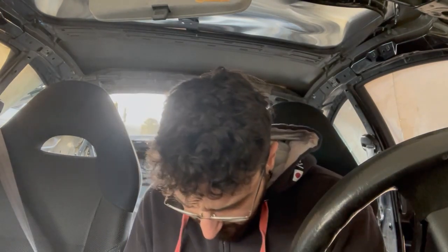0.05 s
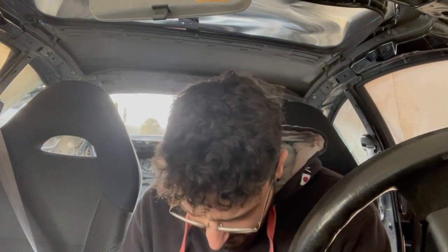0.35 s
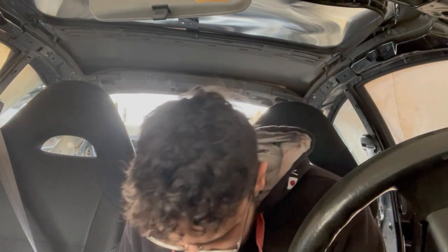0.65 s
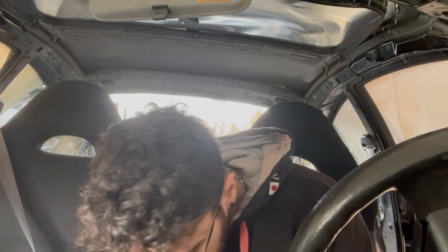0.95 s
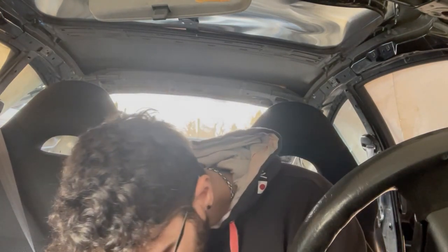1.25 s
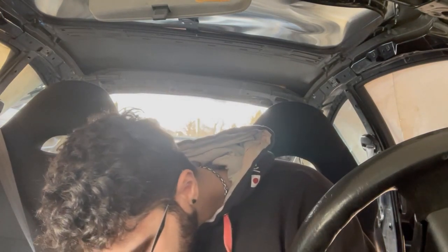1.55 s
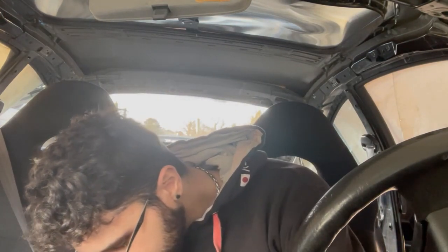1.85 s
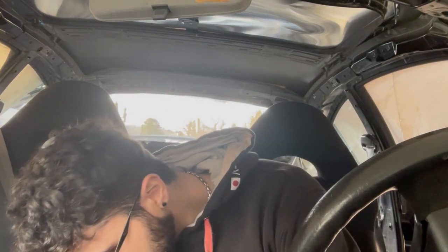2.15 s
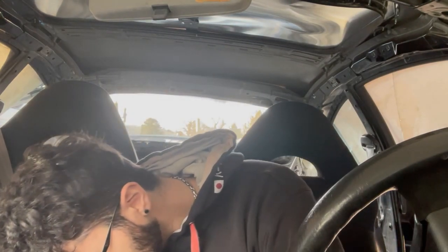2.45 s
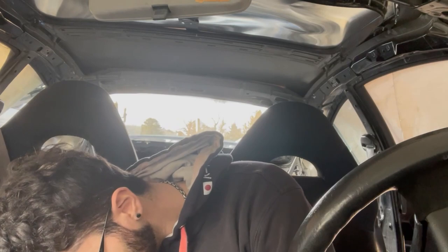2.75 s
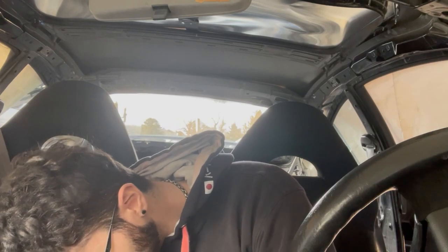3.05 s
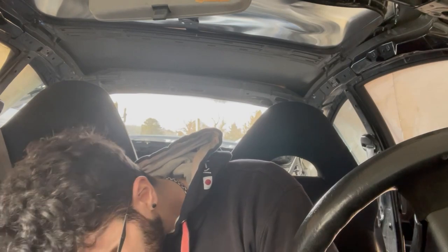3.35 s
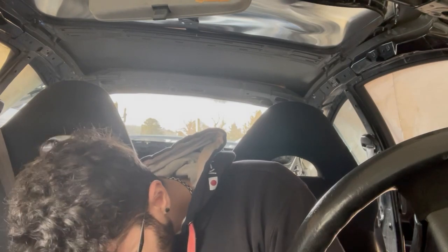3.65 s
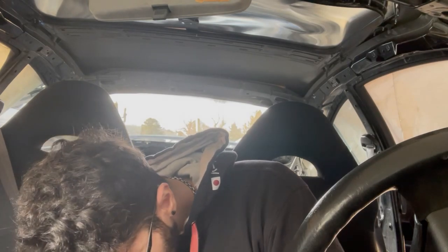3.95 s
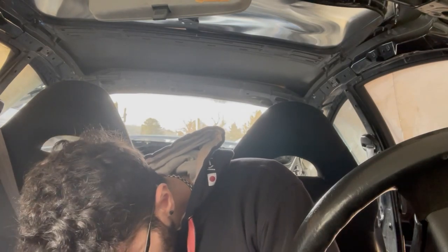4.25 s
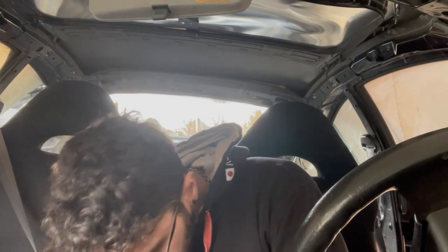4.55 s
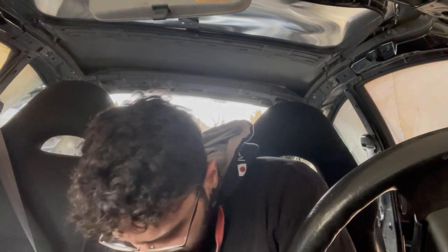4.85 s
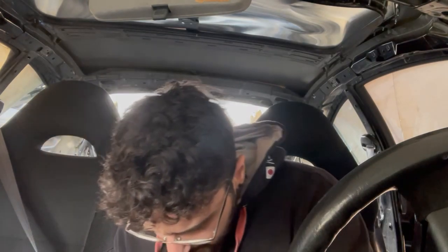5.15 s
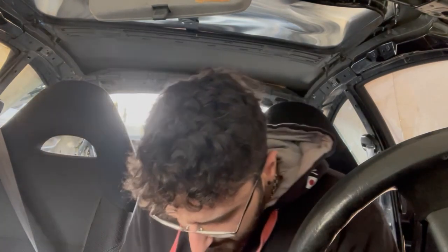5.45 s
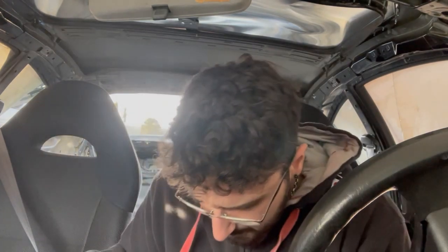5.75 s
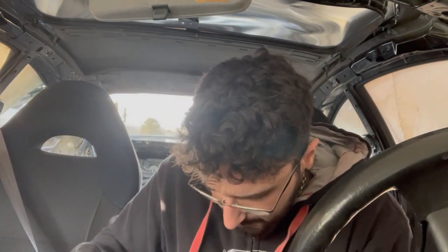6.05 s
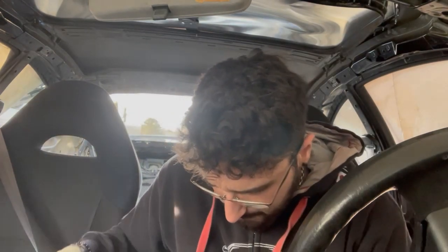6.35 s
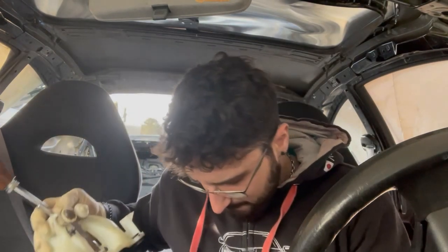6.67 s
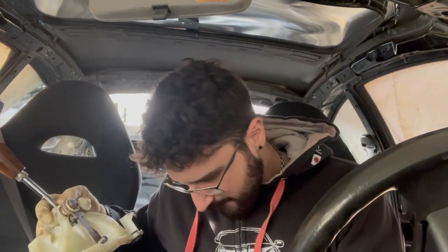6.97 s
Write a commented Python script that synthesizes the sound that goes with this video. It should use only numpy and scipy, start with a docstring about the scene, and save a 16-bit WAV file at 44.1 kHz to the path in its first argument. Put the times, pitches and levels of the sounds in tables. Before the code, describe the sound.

A gear shifter is worked loose from a car's console, with hollow knocks, plastic clicks and scrapes, then a sharp clack.

```python
"""Inside a parked car, a phone near the dashboard hears the centre console through dense, short cabin echoes.
In the first second, gloved hands rock the gear shifter assembly hard: each contact thumps the console,
booms in the cabin and rings the plastic and steel housing. Sparser knocks follow as it is worked loose,
with scraping parts, brushing sleeves and short squeaks from the linkage. At about 6.4 s it clacks free
and the steel lever rings briefly; a light bump and a last drag follow at 7 s."""
import sys
import numpy as np
from scipy import signal
from scipy.fft import rfft, irfft
from scipy.io import wavfile

SR = 44100
rng = np.random.default_rng(int(sys.argv[2]) if len(sys.argv) > 2 else 0)


def persist_wave(psi):
    """Save psi, clipped to +-1, as 16-bit WAV."""
    counts = np.round(np.clip(psi, -1, 1) * 32767).astype(np.int16)
    wavfile.write(sys.argv[1], SR, np.atleast_2d(counts).T)


N = 317961
TAIL = 2 ** 15  # samples given to one event
CABIN_HZ, CABIN_WIDTH_HZ = 66, 9.7  # the cabin's lowest air mode

# blows on the console: t/s, level/dB, panel f/Hz, relative cabin boom/dB, panel t60/s
KNOCKS = [(0.164, -29, 366, -24, 0.066), (0.285, -42.5, 147, 4, 0.07), (0.392, -31.5, 318, 8, 0.25),
          (0.432, -29.5, 338.5, 5.5, 0.34), (0.475, -23.5, 150, 1, 0.32), (0.539, -25.5, 304, -6, 0.12),
          (0.567, -29, 318, 9.5, 0.47), (0.681, -25.5, 313.4, 4, 0.14), (0.719, -22.5, 276, 5, 0.046),
          (0.743, -36, 416, -2.5, 0.063), (0.809, -26, 360, -1.5, 0.14), (0.953, -37, 314.5, 10, 0.63),
          (1.009, -33.5, 115.7, 6, 0.36), (1.141, -33, 321.3, 5, 0.12), (1.516, -29, 232.4, -3, 0.16),
          (1.551, -23.5, 262.5, 3.5, 0.13), (1.84, -27, 122.7, -2.5, 0.1), (2.112, -32, 298.5, -17, 0.049),
          (2.128, -26, 188, -12, 0.12), (2.171, -36, 235, 7, 0.28), (2.314, -34, 317, 0.5, 0.11),
          (2.435, -29, 224, -12, 0.16), (2.634, -34, 56.4, -3, 0.75), (2.704, -31.5, 268.4, -3, 0.15),
          (3.049, -34.5, 295.3, 6.5, 0.21), (3.204, -37.5, 116, 7.5, 0.17), (3.287, -33, 488, -6.5, 0.081),
          (3.419, -34.5, 210.7, 6, 0.23), (3.857, -39.5, 340, -2, 0.26), (3.95, -32.5, 137, -5, 0.14),
          (4.32, -37, 228, -1, 0.017), (4.371, -38, 125, -8, 0.18), (4.73, -37.5, 314, -2.5, 0.052),
          (5.031, -29.5, 265.4, -26, 0.26), (5.061, -35.5, 231, -13, 0.14), (5.198, -33.5, 128, -10, 0.083),
          (5.199, -35.5, 371, -38, 0.11), (5.204, -34, 463, -44, 0.13), (5.419, -25.5, 133.4, -4.5, 0.15),
          (5.628, -30, 185.3, -10.5, 0.23), (5.904, -29, 272, -12, 0.065), (5.953, -31, 146.4, -2, 0.089),
          (6.02, -31.5, 110.4, 1.5, 0.11), (6.405, -28.5, 330, 2.5, 0.19), (6.428, -25, 250, 6, 0.16),
          (6.464, -19.5, 386, -9.5, 0.086), (6.468, -25.5, 135, -4, 0.057), (7.017, -46, 133, 11.5, 0.15)]
# hard contacts of the housing: t/s, level/dB, touched part f/Hz, hardness (relative tick level)/dB
CLICKS = [(0.161, -56.5, 1180, -35), (0.384, -50.5, 1900, -19), (0.403, -42.5, 3100, -22),
          (0.443, -39.5, 2150, -17), (0.482, -42.5, 3600, -56), (0.52, -33, 2150, -12.5),
          (0.541, -32, 1930, -11), (.548, -39, 2370, -23), (0.672, -45.5, 1600, -11.5),
          (0.715, -44, 1620, -30), (0.738, -50, 2500, -29), (0.814, -50, 950, -17), (0.871, -54, 3170, -8),
          (1.127, -54, 1310, 11.5), (1.141, -49.5, 1106, -8), (1.504, -43.5, 2140, -19),
          (1.554, -41.5, 1270, -16.5), (1.824, -56.5, 1310, -13), (2.033, -55, 850, -5.5),
          (2.165, -52.5, 1510, -20), (2.366, -44, 2990, -1.5), (2.388, -51, 970, -10),
          (2.456, -54, 920, -4.5), (2.699, -47, 1090, -3), (3.011, -44, 3930, -9.5),
          (3.046, -52, 1130, -10.5), (3.129, -55, 2600, -5.5), (3.227, -39.5, 2800, -23),
          (3.241, -49.5, 1760, -20), (3.279, -46.5, 1350, -18), (3.414, -51.5, 1384, -10.5),
          (3.846, -58, 3550, -34), (3.927, -59.5, 4030, -9), (3.95, -52, 1250, -16),
          (4.112, -69.5, 3500, 1.5), (4.227, -55.5, 3630, -6.5), (4.315, -58, 1370, -30.5),
          (4.478, -55, 1650, -9), (4.493, -50.5, 1600, -9), (4.535, -57.5, 935, -5),
          (4.725, -48.5, 2010, 0), (4.795, -48.5, 960, 1), (5.069, -51, 1945, -32), (5.409, -65, 1430, 4),
          (5.425, -57, 1800, -29), (5.901, -56.5, 940, -33), (5.957, -60.5, 1360, -33),
          (6.074, -59.5, 4360, -5.5), (6.346, -55, 1570, -3.5), (6.404, -28.5, 4230, -7),
          (6.415, -35, 3100, -20), (6.429, -37, 1370, -16), (6.463, -27.5, 1310, -14),
          (6.705, -66, 3080, -19), (7.018, -50, 2180, -10)]
# how busily the hands work, as the rubbing between contacts: t/s, level/dB
EFFORT = [(0.0, -57.5), (0.34, -59.5), (0.58, -48), (1.06, -54.5), (1.26, -66), (1.95, -65), (2.24, -55.5),
          (2.6, -54.5), (2.82, -65), (2.99, -69.5), (3.1, -54.5), (3.35, -58.5), (3.56, -69.5),
          (3.66, -84.5), (4.05, -70.5), (4.52, -63.5), (5.19, -56), (5.79, -66), (6.37, -57.5), (6.92, -63),
          (7.21, -54.5)]
# resonances of the shifter housing: f/Hz, width/Hz, boost/dB
HOUSING = [(586, 40, 16.5), (666, 112, 17.5), (831.3, 12, 17), (970, 21, 0), (1134, 240, 3.5),
           (1460, 54, 5), (2200, 11, -4.5), (2940, 1600, 2), (4350, 1500, -9)]
# resonances of the console panels: f/Hz, width/Hz, boost/dB
CONSOLE = [(178, 92, 4), (215, 150, 2.5), (313, 56, 3.5), (439, 23, 3.5)]
# upper modes of the thin plastic shell: f/Hz, level/dB, t60/s
SHELL = [(1840, -5.5, 0.047), (2550, 6, 0.069), (3120, 9, 0.049), (4425, 5.5, 0.059)]


def undb(db):
    """Decibels to gain."""
    return 10 ** (np.asarray(db) / 20)


def unit(x):
    """Scale to rms 1."""
    return x / np.sqrt(np.mean(x ** 2))


def band(x, lo_hz, hi_hz, order=3):
    """Causal band-pass."""
    return signal.sosfilt(signal.butter(order, [lo_hz, hi_hz], "band", fs=SR, output="sos"), x)


def add(out, start_s, x):
    """Mix a sound in at its start time."""
    i = max(int(start_s * SR), 0)
    out[:, i:i + x.shape[1]] += x[:, :N - i]


def resonate(x, modes):
    """Pass a sound through a body: its modes ring on top of what goes straight through."""
    hz = np.arange(x.shape[-1] // 2 + 1) * SR / x.shape[-1]
    response = 1 + sum(undb(db) / (1 + 2j * (hz - mode_hz) / width) for mode_hz, width, db in modes)
    return irfft(rfft(x) * response, x.shape[-1])


def fade(t60, rise_s):
    """Envelope that swells smoothly from rest and dies away."""
    t = np.arange(TAIL) / SR
    return (1 - np.exp(-t / rise_s)) ** 2 * np.exp(-np.log(1000) * t / t60)


def ring(hz, t60, rise_s):
    """One decaying mode (mid, side), a little stronger at the right microphone."""
    phase = rng.uniform(0, 2 * np.pi) + np.array([[0], [.6 * np.pi]])
    return np.sin(2 * np.pi * hz * np.arange(TAIL) / SR + phase) * fade(t60, rise_s)


def echoes(envelope, uneven_db=4):
    """One impact as a train of unequal cabin reflections (mid, side)."""
    return rng.standard_normal((2, TAIL)) * undb(uneven_db * rng.standard_normal(TAIL)) * envelope


def struck(x, db):
    """Set the rms level of a blow over its first 35 ms."""
    head = x[:, :int(.035 * SR)]
    return x * undb(db) / np.sqrt(np.mean(head ** 2))


def drain(energy, t60):
    """Stored energy: each input adds to it and dies away exponentially."""
    return signal.lfilter([1], [1, -np.exp(-2 * np.log(1000) / (t60 * SR))], energy)


def aftermath(t60, spread_s=.003):
    """Gain of the motion left by the knocks: their energy spreads through the car and drains away."""
    energy = np.zeros(N)
    for start_s, db, *_ in KNOCKS:
        energy[int(start_s * SR)] += undb(db) ** 2
    gain = np.sqrt(drain(energy + 1e-18, t60))
    follow = 1 / (spread_s * SR)
    return signal.lfilter([follow ** 2], np.poly([1 - follow, 1 - follow]), gain)


def effort():
    """Gain of the hands' rubbing at every sample."""
    times, levels_db = np.transpose(EFFORT)
    return undb(np.interp(np.arange(N) / SR, times, levels_db))


def strokes(table, attack_s, t60):
    """Gain of sliding movements: each builds up, holds for its length and dies away."""
    t, gain = np.arange(TAIL)[None] / SR, np.zeros((1, N))
    for start_s, length_s, db in table:
        release_db = 60 * np.maximum(t - length_s, 0) / t60
        add(gain, start_s, undb(db - release_db) * np.minimum(t / attack_s, 1))
    return gain


def hiss(level_db=-80):
    """Faint steady hiss of the phone's two microphones."""
    return undb(level_db) * rng.standard_normal((2, N))


def cabin(rest_db=-45, sway_db=-15.5):
    """Room tone: the closed cabin hums at its lowest air mode, swelling as the blows sway the car."""
    air = resonate(rng.standard_normal((2, N)), [(CABIN_HZ, CABIN_WIDTH_HZ, 18)])
    sway = undb(sway_db) * aftermath(t60=0.96)
    return unit(band(air, 32, 163, order=2)) * np.hypot(undb(rest_db), sway)


def crinkles(per_s=140, lowest_hz=1400, highest_hz=4800, uneven_db=3):
    """Small snags: each catches another spot of the plastic and rings briefly at its own pitch."""
    out, envelope = np.zeros((2, N)), fade(t60=0.068, rise_s=.0005)[:TAIL // 8]
    for when, spot, size in rng.random((per_s * N // SR, 3)):
        b, a = signal.iirpeak(lowest_hz * (highest_hz / lowest_hz) ** spot, Q=6, fs=SR)
        snag = signal.lfilter(b, a, rng.standard_normal((2, len(envelope))) * envelope)
        snag_db = uneven_db * min(-np.log(1 - size), 3)
        add(out, when * N / SR, unit(snag) * undb(snag_db))
    return unit(out)


def sleeves(rest_db=-7, flutter_db=2.4, crinkle_db=-4, shell_width_hz=220):
    """Fabric swishes over the shell as the arms move, and the gloves crinkle on the plastic."""
    # a sleeve brushes past: t/s, length/s, level/dB
    brushes = [(0, 0.094, -53), (1.99, 0.086, -59), (4.55, 0.22, -61.5), (4.945, 0.14, -57),
               (5.1, 0.42, -66), (5.89, 0.15, -58.5), (6.18, 0.38, -60.5), (6.642, 0.21, -61.5)]
    flutter = unit(band(rng.standard_normal(N), 4, 25, order=2))
    body = HOUSING + [(hz, shell_width_hz, db - 6.5) for hz, db, _ in SHELL]
    fabric = resonate(rng.standard_normal((2, N)), body)
    swish = band(fabric, 3200, 12000, order=1) * undb(flutter_db * flutter)
    rustle = unit(unit(swish) + undb(crinkle_db) * crinkles())
    return rustle * np.hypot(effort() * undb(rest_db), strokes(brushes, attack_s=0.0043, t60=0.16))


def friction(t60, even_power, slips_per_s):
    """Tiny slips of unequal size, each smeared by the cabin, over an even rubbing hiss."""
    slips = (rng.random(N) < slips_per_s / SR) * rng.exponential(size=N) ** 2
    power = drain(slips, t60)
    return rng.standard_normal((2, N)) * np.sqrt(power / power.mean() + even_power)


def handling(rumble_db=15, settle_db=-2, slide_db=-7, crunch_db=-4):
    """The assembly shuffles in its seat; parts scrape in the hollow console and crunch on the shell."""
    # the housing dragged across the console edge: t/s, length/s, level/dB
    drags = [(.379, 0.076, -35.5), (.543, 0.013, -36), (.665, 0.068, -37.5), (.93, 0.2, -63.5),
             (1.48, 0.069, -48), (7.06, 0.11, -59.5)]
    panels = resonate(friction(t60=0.19, even_power=0.065, slips_per_s=300), CONSOLE)
    hollow = resonate(friction(t60=0.14, even_power=0.13, slips_per_s=140), HOUSING + [(1320, 940, 6.4)])
    # the assembly settles after each knock, and the parts slide on after each click
    settling = undb(settle_db) * aftermath(t60=0.28)
    slide_s = 0.0074
    scuffs = [(start_s, slide_s, db + slide_db) for start_s, db, *_ in CLICKS]
    dragging = strokes(drags, attack_s=0.014, t60=0.26)
    sliding = strokes(scuffs, attack_s=slide_s, t60=.1) + dragging
    rumble = unit(band(panels, 110, 409, order=2)) * np.hypot(effort() * undb(rumble_db), settling)
    scrape = unit(band(hollow, 440, 2000, order=2)) * np.hypot(effort(), sliding)
    crunch = crinkles() * dragging * undb(crunch_db)
    return rumble + scrape + crunch


def squeaks(waver_depth=.06, roughness=.5, edge_s=0.0039, echo_db=-6):
    """The linkage sticks and slips in its bush: short, rough, wavering tones, smeared by the cabin."""
    # slips, loudest as the linkage tears free: t/s, length/s, f/Hz, level/dB, overtone boost/dB
    slips = [(2.099, .03, 783, -42.5, -23), (2.52, 0.023, 1520, -52, -18), (2.568, 0.014, 1530, -47, -12),
             (3.795, 0.031, 837, -56, -24), (3.825, 0.015, 1370, -54, -12), (4.681, 0.051, 1528, -53.5, 4),
             (6.4, 0.014, 1479, -17.5, 3.5), (7.06, 0.083, 1477, -54.5, -26)]
    # a squeak's harmonics, lowest first: level/dB
    harmonics_db = [5.5, -6, -4, -7.5, -13]
    out, t = np.zeros((2, N)), np.arange(TAIL) / SR
    mid_side_phase = np.array([[0], [np.pi / 2]])
    for start_s, length_s, hz, db, overtones_db in slips:
        waver = unit(band(rng.standard_normal(TAIL), 24, 450, order=1))
        phase = 2 * np.pi * np.cumsum(hz * (1 + waver_depth * waver)) / SR
        tone = sum(undb(harmonic_db + overtones_db * (k > 1)) * np.sin(k * phase + mid_side_phase)
                   for k, harmonic_db in enumerate(harmonics_db, 1))
        grip = 1 + roughness * unit(band(rng.standard_normal(TAIL), 20, 450, order=1))
        gate = np.clip(np.minimum(t, length_s - t) / edge_s, 0, 1)
        direct = tone * grip * gate
        smear = signal.fftconvolve(direct, echoes(fade(0.12, 0.0019)), axes=1)[:, :TAIL]
        squeak = unit(unit(direct) + undb(echo_db) * unit(smear))
        add(out, start_s, undb(db) * squeak * np.sqrt(length_s * SR / TAIL))
    return out


def lever(freed_s=6.465, level_db=-31):
    """No longer damped by its seat, the steel lever rings on as it comes free."""
    # modes of the lever: f/Hz, level/dB, t60/s
    modes = [(860, -10, .19), (1030, 3, 0.18)]
    out = np.zeros((2, N))
    steel = sum(undb(db) * ring(hz, t60, rise_s=.001) for hz, db, t60 in modes)
    add(out, freed_s, struck(steel, level_db))
    return out


def chime(modes, level_db, detune=.03, uneven_db=3):
    """A small part rings; at every contact the grip detunes its modes and favours different ones."""
    grip = rng.standard_normal((len(modes), 2))
    ringing = sum(undb(db + uneven_db * favour) * ring(hz * (1 + detune * shift), t60, rise_s=0.00087)
                  for (hz, db, t60), (shift, favour) in zip(modes, grip))
    return struck(ringing, level_db)


def clicks(hollow_hz=1452, part_q=10):
    """Plastic and steel meet: a hollow clack, a click and a bright tick; part, shell and catches ring."""
    # modes of the small catches, which ring louder on hard contacts: f/Hz, level/dB, t60/s
    catches = [(3940, 6.5, 0.07), (6360, 8.5, 0.088), (9640, -6, 0.04), (10900, -16.5, 0.031)]
    out = np.zeros((2, N))
    for start_s, db, hz, hardness_db in CLICKS:
        # the clack fades for parts that ring above the housing's pitch, and for harder contacts
        clack_db = 7.5 - 11.5 * max(np.log2(hz / hollow_hz), 0) - 0.28 * hardness_db
        tick_low_hz = 4100 + 320 * max(hardness_db, 0)  # the hardest contacts push the tick upwards
        part = [(hz, hz / part_q, 6)]
        impact = resonate(resonate(echoes(fade(0.12, 0.0014)), HOUSING), part)
        # the upholstery swallows most of the treble at once and leaves a faint tail
        treble = resonate(echoes(fade(0.086, 0.001) + undb(-10) * fade(0.16, 0.001)), part)
        clack = struck(band(impact, 340, 1960), clack_db)
        click = struck(band(impact, 2470, 6280), db=-2)
        tick = struck(band(treble, tick_low_hz, 13700), hardness_db + 2)
        part_ring = struck(ring(hz, t60=0.069, rise_s=0.00026), db=-9)
        shell_ring = chime(SHELL, level_db=-4)
        catch_ring = chime(catches, level_db=-4 + min(hardness_db, 3))
        contact = clack + click + tick + part_ring + shell_ring + catch_ring
        add(out, start_s - .001, undb(db) * contact)
    return out


def knocks(glancing_below_db=-8):
    """The assembly bumps the console: the struck panel rings, its neighbours shake, the cabin booms."""
    out = np.zeros((2, N))
    for start_s, db, hz, boom_db, t60 in KNOCKS:
        rap_db = -3.5 + 5.5 * np.log2(hz / 250)  # small, high panels rap more sharply than large ones
        # a glancing blow that hardly stirs the cabin rings little but its own panel
        shake_db = .45 * min(boom_db - glancing_below_db, 0)
        shake = resonate(echoes(fade(0.17, 0.0011)), CONSOLE)
        air = resonate(echoes(fade(0.47, 0.001)), [(CABIN_HZ, CABIN_WIDTH_HZ, 3)])
        panel = struck(ring(hz, t60, rise_s=0.0012), db=0)
        body = struck(band(shake, 184, 236.6, order=2), shake_db - 4)
        rap = struck(band(shake, 294, 631), rap_db + shake_db)
        boom = struck(band(air, 54, 137.5), boom_db - 4)
        add(out, start_s - .002, undb(db) * (panel + body + rap + boom))
    return out


def glass_reflections(x, corner_hz=1800):
    """Windscreen and side glass mirror the treble to the phone and comb it; the bass bends around them."""
    # first reflections off the panes: delay/s, level/dB
    panes = [(.0023, -44), (.0041, -26.5), (.0067, -20)]
    hz = np.arange(N // 2 + 1) * SR / N
    treble = hz ** 2 / (hz ** 2 + corner_hz ** 2)
    reflections = sum(undb(db) * np.exp(-2j * np.pi * hz * delay_s) for delay_s, db in panes)
    return irfft(rfft(x) * (1 + treble * reflections), N)


def stereo_field(mid_side, tilt_right_db=0.5):
    """Mid and side to left and right; some bands sound wide, others narrow."""
    # stereo width at the phone: f/Hz, side minus mid/dB
    width = [(60, -13), (120, -3), (310, -9), (480, 4.5), (750, 7.5), (950, 0.5), (2300, -1), (7800, 4),
             (12100, -9), (15000, -6.5)]
    points_hz, width_db = np.transpose(width)
    mid, side = rfft(mid_side)
    hz = np.arange(len(mid)) * SR / N
    ratio = undb(np.interp(np.log(hz + 1), np.log(points_hz), width_db))
    mid, side = irfft(np.array([mid, side * ratio]) / np.sqrt(1 + ratio ** 2), N)
    return np.array([(mid + side) * undb(-tilt_right_db), (mid - side) * undb(tilt_right_db)])


def scene():
    """The work at the console over the cabin's hum, heard from the dashboard."""
    work = knocks() + clicks() + lever() + squeaks() + handling() + sleeves()
    return stereo_field(glass_reflections(work) + cabin())


def record(dry):
    """The phone adds its own hiss, clips at full scale and cuts the top above 15.9 kHz."""
    top_cut = signal.ellip(8, .2, 70, 15900, fs=SR, output="sos")
    return signal.sosfilt(top_cut, np.clip(dry + hiss(), -1, 1))


dry = scene()
out = record(dry)
persist_wave(out)
```